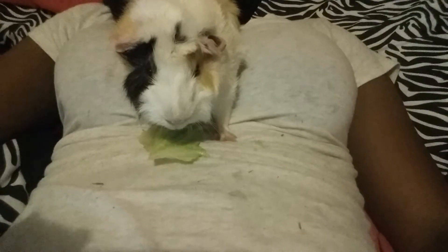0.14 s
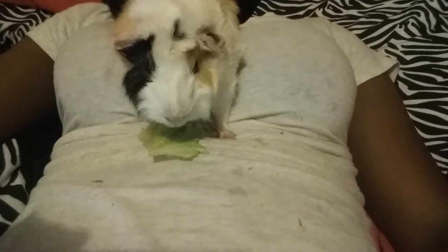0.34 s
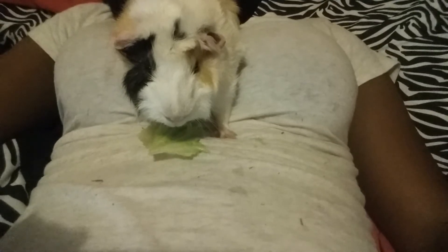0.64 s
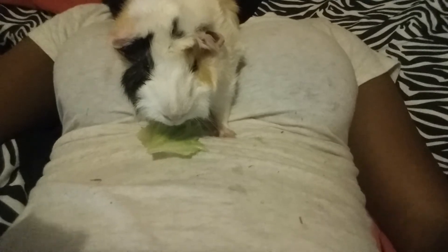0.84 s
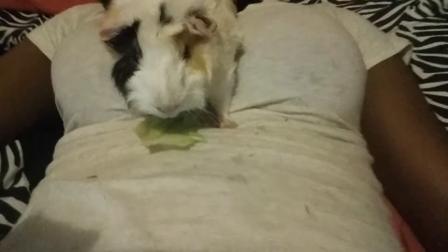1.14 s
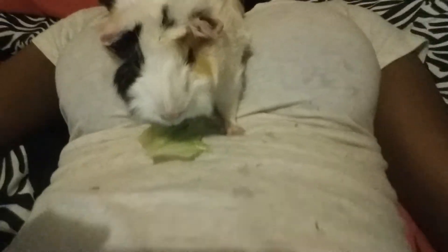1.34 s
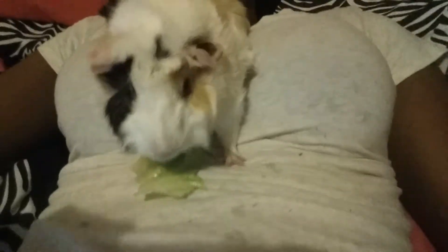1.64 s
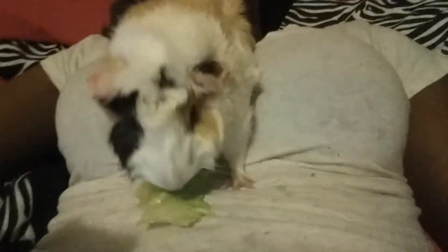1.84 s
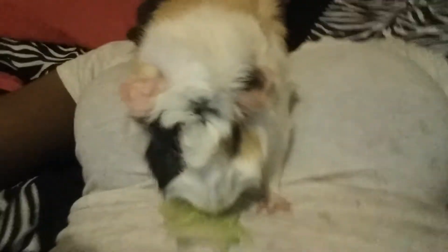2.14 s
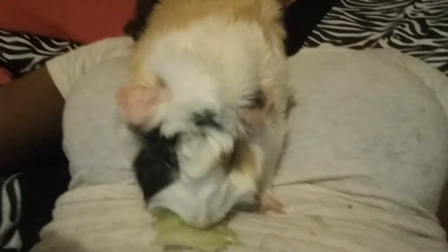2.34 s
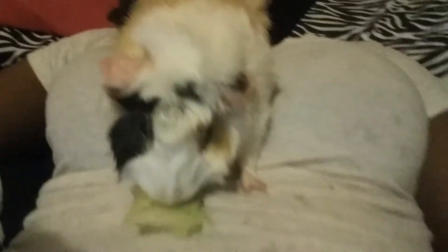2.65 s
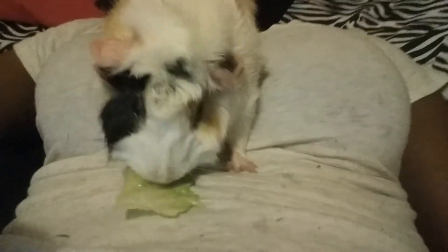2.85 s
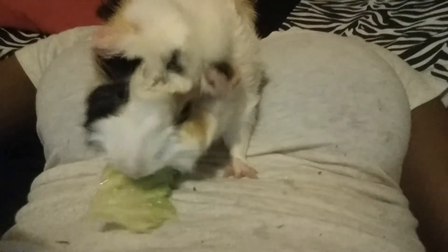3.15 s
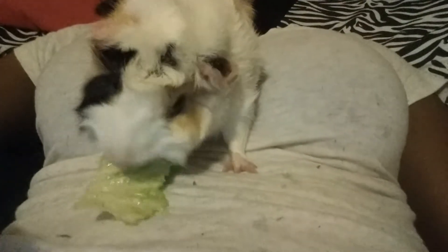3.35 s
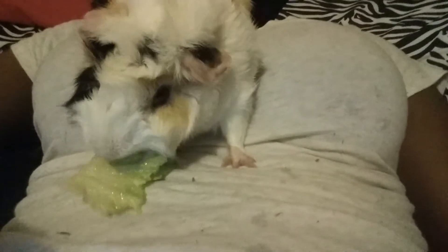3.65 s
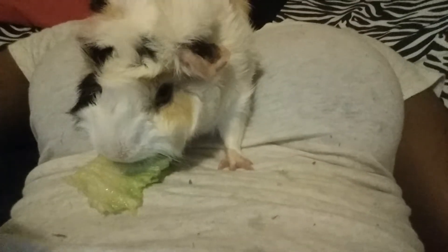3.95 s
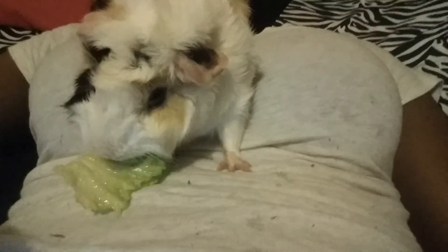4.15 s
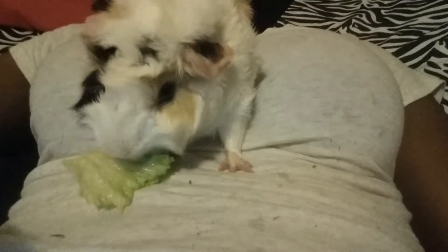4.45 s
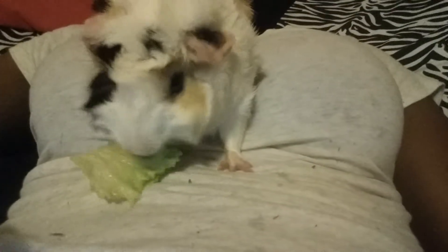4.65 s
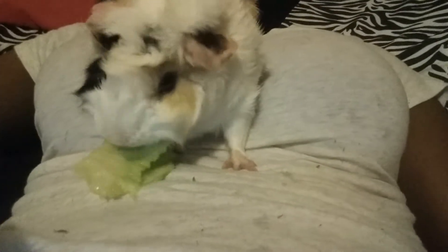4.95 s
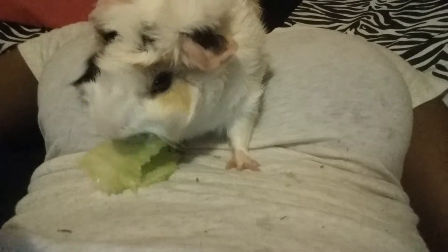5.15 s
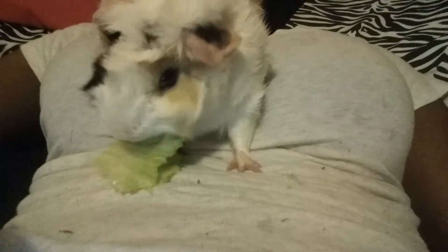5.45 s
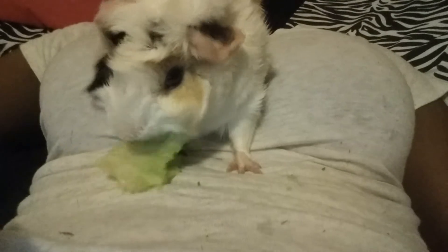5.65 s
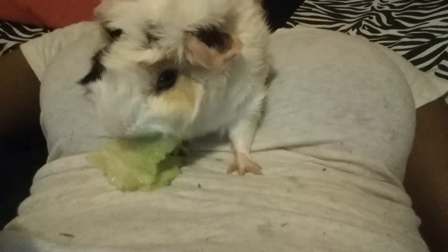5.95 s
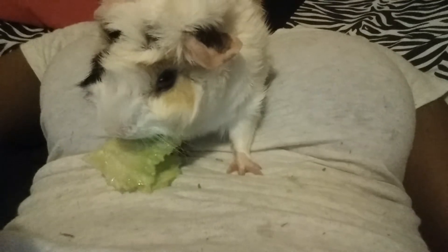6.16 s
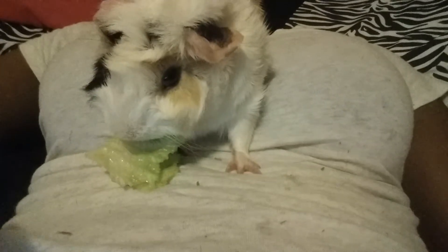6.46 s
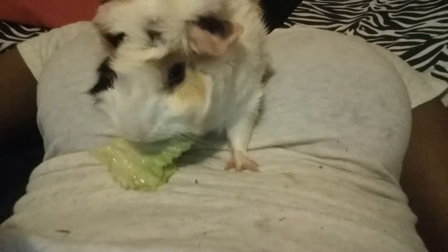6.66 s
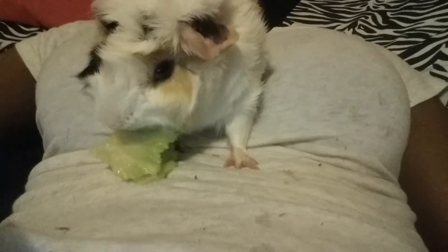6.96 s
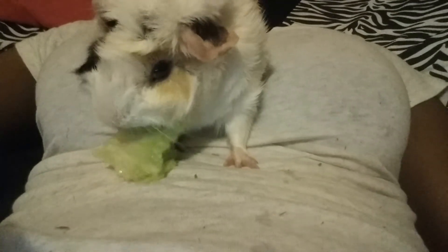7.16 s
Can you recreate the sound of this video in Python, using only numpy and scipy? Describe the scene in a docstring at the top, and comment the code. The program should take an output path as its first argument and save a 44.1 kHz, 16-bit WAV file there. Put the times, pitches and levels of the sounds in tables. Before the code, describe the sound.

Close handheld stereo pickup in a dry indoor room. First only dull low humming and gentle hiss, then under a second of skin rubbing and tapping on the device case, mostly left. After that, quick irregular lettuce chewing by a small animal fills the rest: bright crackling bites, snapping ribs, brief gaps, tiny moist squelches and light rustling, mainly right, with the hum continuing underneath to the end.

```python
"""From the start a household machine hums through room resonances, over soft hiss and a slowly rising whine.
At about 1.5 s a hand slides over the left of a phone's two ports and taps the case: rubbed noise and short rings.
From 2.4 s to the end a guinea pig just in front bites and grinds lettuce: crackling noise shaped by jaw
strokes, bursts for snapping ribs and rising bubbles for wet smacks. The right port faces it, the left is shaded.
Fur and cloth rustle, as noise that comes and goes, from the handling onward."""
import sys
import numpy as np
from scipy import signal
from scipy.fft import rfft, irfft, next_fast_len
from scipy.io import wavfile
from scipy.ndimage import uniform_filter1d, map_coordinates

SR = 44100
rng = np.random.default_rng(int(sys.argv[2]) if len(sys.argv) > 2 else 0)


def output_pcm(signal):
    """Save a mono or channel-first signal as 16-bit PCM at the path in sys.argv[1].

    Samples are clipped to [-1, 1] before scaling.
    """
    pcm = np.clip(np.atleast_2d(signal).T, -1, 1) * 32767
    wavfile.write(sys.argv[1], SR, np.round(pcm).astype(np.int16))


N = 322371

# jaw strokes: t/s, length/s, grinding level about a quarter through/dB, about three quarters through/dB
STROKES = [(2.414, 0.12, -48, -54.5), (2.652, 0.073, -46, -60), (2.781, 0.026, -58, -63),
           (2.859, 0.025, -60.5, -65), (2.996, 0.035, -61, -58), (3.075, 0.089, -47.5, -42.5),
           (3.291, 0.053, -35, -42), (3.489, 0.077, -34, -34), (3.796, 0.069, -36, -39.5),
           (3.875, 0.058, -48, -63), (4.089, 0.052, -51.5, -56), (4.158, 0.055, -36.5, -32),
           (4.405, 0.039, -52.5, -61), (4.454, 0.074, -45, -54), (4.552, 0.022, -72, -55.5),
           (4.61, 0.056, -41.5, -42), (4.774, 0.03, -49.5, -34), (4.873, 0.021, -51, -61),
           (4.965, 0.042, -43.5, -40.5), (5.126, 0.067, -42.5, -59), (5.196, 0.061, -57, -56),
           (5.284, 0.064, -44.5, -47), (5.385, 0.028, -58, -60), (5.442, 0.072, -38, -44.5),
           (5.566, 0.039, -53, -55), (5.627, 0.047, -52.5, -69), (5.705, 0.082, -57, -53),
           (5.846, 0.021, -58, -63), (5.898, 0.059, -39.5, -33), (6.049, 0.056, -35.5, -33.5),
           (6.305, 0.016, -56, -51), (6.351, 0.063, -34.5, -32.5), (6.891, 0.037, -35.5, -43),
           (6.94, 0.046, -68, -67), (7.043, 0.011, -43, -47), (7.057, 0.057, -30.5, -40),
           (7.216, 0.066, -36.5, -30)]
# how the port facing the animal colours the crunch: f/Hz, level/dB
FRONT_COLOUR = [(1000, -14), (2500, -17.5), (3500, -12), (4300, -7.5), (5600, -5), (6800, -7.5),
                (8000, -5.5), (9500, -8), (11000, -7), (12500, -7), (15000, -10.5)]
# how the shaded port colours the crunch: f/Hz, level/dB
SHADE_COLOUR = [(1000, -15.5), (2800, -13), (3500, -6.5), (4300, 5.5), (5300, -6), (6200, 8.5), (7200, -10),
                (8800, -3), (9800, -18), (12000, -9), (15000, -42)]
MOUTH_HZ, MOUTH_WIDTH_HZ = 1850, 420  # usual ring of the mouth cavity
USUAL_DB = -45  # grinding level of a usual stroke
HISS_TOP_HZ, TOP_HZ = 15600, 16800  # upper limits of the hiss and of the whole sound


def amp(db):
    """Turn decibels into a plain factor."""
    return 10 ** (np.asarray(db) / 20)


def unit(x):
    """Scale each row to an average (RMS) strength of 1."""
    return x / np.sqrt(np.mean(x ** 2, axis=-1, keepdims=True) + 1e-20)


def curve(rows):
    """Join (time, value) rows by straight lines, one value per sample."""
    times, values = np.transpose(rows)
    return np.interp(np.arange(N) / SR, times, values)


def colour(points):
    """Tone colour: a gain over frequency from (Hz, dB) points on a log axis."""
    point_hz, point_db = np.transpose(points)
    return lambda f: amp(np.interp(np.log(f + 1), np.log(point_hz), point_db))


def mode(centre_hz, width_hz):
    """A resonance that rings only after it is struck, with gain 1 at its peak."""
    return lambda f: 1j * f * width_hz / (centre_hz ** 2 - f * f + 1j * f * width_hz)


def bump(f, hz, width_hz):
    """A broad rise of the spectrum around hz."""
    return 0.96 + np.exp(-((f - hz) / width_hz) ** 2)


def filtered(x, response):
    """Filter each row by multiplying its spectrum by a response over frequency."""
    size = next_fast_len(x.shape[-1] + 4096)  # spare room for the ringing
    spectrum = rfft(x, size) * response(np.fft.rfftfreq(size, 1 / SR))
    return irfft(spectrum, size)[..., :x.shape[-1]]


def wobble(rate):
    """A smooth random curve through rate random points a second."""
    points = rng.standard_normal(int(N * rate / SR) + 4)
    return map_coordinates(points, [np.arange(N) * rate / SR])


def lay(times, shapes, peak_db):
    """Place each short sound at its time, scaled to its peak level."""
    shapes = shapes / np.abs(shapes).max(axis=1, keepdims=True) * amp(peak_db)[:, None]
    first = np.round(np.asarray(times) * SR).astype(int)[:, None]
    places = first + np.arange(shapes.shape[1])
    return np.bincount(places.ravel(), shapes.ravel(), N + SR)[:N]


def crackle(spread_db, count):
    """Many clicks at chance moments, of widely scattered size, like bursting cells."""
    size = amp(spread_db * rng.exponential(size=count)) * rng.standard_normal(count)
    return unit(np.bincount(rng.integers(0, N, count), size, N))


def pops(times, peak_db, hz, cycles):
    """Soft rings that fade by 60 dB in the given number of cycles."""
    turns = np.outer(hz, np.arange(2600) / SR)
    soft_start = np.minimum(turns / 0.3, 1)
    ring = np.sin(2 * np.pi * turns) * amp(-60 * turns / cycles) * soft_start
    return lay(times, ring, peak_db)


def grinding():
    """Molars crush leaf cells: crackling swells with each jaw stroke and the mouth cavity rings along."""
    t, out = np.arange(N) / SR, np.zeros((2, N))
    flutter = amp(4 * wobble(170))  # pressure flutters as fibres give way
    cells = patchy(crackle(1.44, count=30000), depth_db=3.5) * flutter
    mouth_grows = 0.75  # dB of mouth ring for each dB of grinding
    for start, length, early_db, late_db in STROKES:
        span = slice(int(start * SR) - 300, int((start + length) * SR) + 2600)
        age, crushed = t[span] - start, cells[span]
        left_db, bright_hz, ring_db = head(start)
        level_db = (early_db + late_db) / 2
        mouth_db = ring_db + mouth_grows * (level_db - USUAL_DB)

        phase = 2 * np.clip(age / length, 0, 1) - 1  # -1 to 1 through the stroke
        slope = amp((late_db - early_db) * phase - 2.3 * phase ** 2)  # the bend favours mid-stroke
        attack = np.clip(age / 0.0035 + 1, 0, 1)
        release = amp(-800 * np.clip(age - length, 0, 1))  # falls 800 dB per s
        force = slope * attack * release

        left = amp(left_db) * unit(filtered(scatter(crushed, 0.013), colour(SHADE_COLOUR)))
        right = unit(filtered(scatter(crushed, 0.0018),
                              lambda f: colour(FRONT_COLOUR)(f) * bump(f, bright_hz, 2700)))
        opening = amp(rng.normal(0, 0.26))  # the jaw shifts the cavity pitch
        ring = unit(filtered(crushed,
                             lambda f: mode(opening * MOUTH_HZ, MOUTH_WIDTH_HZ)(f) * f / (f + 900)))
        crunch = amp(level_db) * np.array([left, right])
        mouth = amp(mouth_db) * amp([[-18.5], [-7.5]]) * ring
        out[:, span] += force * (crunch + mouth)
    return out


def patchy(x, depth_db):
    """Random gain in small patches of time and pitch: every torn piece of leaf has its own timbre."""
    z = signal.stft(x, nperseg=128)[2]
    field = uniform_filter1d(rng.standard_normal(z.shape), size=7, axis=0)  # smooth over pitch
    field = uniform_filter1d(field, size=5, axis=1)  # smooth over time
    return signal.istft(z * amp(depth_db * field / field.std()), nperseg=128)[1][:N]


def scatter(x, t60):
    """Reflections off leaf, fur and cloth smear the sound; they fade by 60 dB in t60 seconds."""
    t = np.arange(400) / SR
    echoes = amp(-60 * t / t60) * rng.standard_normal(len(t))
    return signal.fftconvolve(x, echoes)[:len(x)]


def head(s):
    """The head turns and lifts, changing left level, brightness and mouth ring at the moments s."""
    # head positions: t/s, left port level relative to right/dB, brightness f/Hz,
    # mouth ring level in a usual stroke, ahead of the port offsets/dB
    poses = [(2.4, -3.5, 7550, -53), (2.66, -6.5, 7740, -58), (2.82, -15, 7060, -36), (3.1, -3, 7860, -44),
             (3.4, -9.5, 9400, -51), (3.83, -11.5, 8600, -56), (4.18, -11.5, 9600, -48.5),
             (4.48, -16, 9000, -51.5), (4.8, -22, 8960, -52), (5.13, -7, 9700, -51),
             (5.45, -18, 10900, -46.5), (5.7, -7, 9000, -42), (5.92, -17.5, 10800, -50),
             (6.08, -17.5, 11100, -47.5), (6.38, -15, 9800, -44), (6.7, -2, 9200, -37.5),
             (6.9, -13, 8600, -52), (7.07, -17.5, 11200, -48.5), (7.31, -13.5, 10600, -50.5)]
    times, *columns = np.transpose(poses)
    return [np.interp(s, times, column) for column in columns]


def snaps():
    """Ribs and veins break in short noise bursts with scattered echoes, and the mouth cavity rings."""
    # thick leaf ribs that snap: t/s, peak level at the right port/dB
    ribs = [(2.4642, -15.5), (2.4758, -14.5), (2.479, -22), (2.6582, -30), (3.0096, -24), (3.022, -32),
            (3.1125, -24), (3.1243, -24), (3.1315, -7), (3.1433, -14), (3.1507, -16), (3.3089, -19),
            (3.3226, -18), (3.4895, -23), (3.498, -19), (3.505, -17), (3.5298, -4), (3.5341, -6),
            (3.5504, -14.5), (3.8188, -9), (3.8233, -12.5), (3.837, -11), (3.8457, -1), (3.8831, -17),
            (3.9442, -35), (4.161, -17.5), (4.1715, -26), (4.1866, -25), (4.1892, -10), (4.1948, -5),
            (4.2012, -18), (4.2388, -20), (4.3899, -41), (4.4714, -21), (4.4924, -22), (4.5083, -20),
            (4.624, -19.5), (4.637, -15.5), (4.6609, -14), (4.686, -30), (4.7007, -21), (4.7379, -26),
            (4.7451, -27.5), (4.7765, -26), (4.7976, -7), (4.8074, -8), (4.8265, -15.5), (4.8762, -19.5),
            (4.9498, -29.5), (4.9731, -16.5), (4.9921, -15.5), (5.085, -36), (5.1274, -27), (5.294, -19),
            (5.321, -32), (5.356, -40), (5.443, -22), (5.465, -16), (5.4728, -15.5), (5.6302, -39),
            (5.726, -34), (5.7537, -21.5), (5.773, -34), (5.784, -28), (5.91, -14), (5.9235, -13.5),
            (5.9454, -22), (5.958, -11.5), (6.045, -30), (6.0576, -9.5), (6.071, -19), (6.0758, -8),
            (6.0831, -10), (6.086, -14), (6.109, -22), (6.1177, -26), (6.3561, -27), (6.3749, -3.5),
            (6.3823, -12), (6.3882, -11), (6.3936, -12), (6.4016, -4), (6.4045, -17), (6.4097, -12),
            (6.4159, -16), (6.6797, -34), (6.7266, -24), (6.7313, -29.5), (6.8924, -27), (6.908, -9.5),
            (6.9477, -29), (6.9721, -33), (6.987, -35), (7.045, -27), (7.057, -20), (7.0643, -9.5),
            (7.0775, -6.5), (7.0885, -15), (7.114, -34), (7.232, -7.5), (7.2376, -18), (7.2542, -1.5),
            (7.2573, -22), (7.276, -14), (7.281, -13)]
    s, peak_db = np.vstack([ribs, veins()]).T
    chance = rng.standard_normal((len(s), 4))
    left_db, bright_hz, ring_db = head(s)
    snap_hz = bright_hz * (1 + 0.026 * chance[:, 3])  # each break has its own pitch

    t = np.arange(300) / SR - .0003
    rise = amp(60 * t / .0004)
    decay = amp(-60 * t / .0013) + .1 * amp(-60 * t / .007)  # the break, then its echoes
    burst = rng.standard_normal((len(s), 2, len(t))) * np.where(t < 0, rise, decay)
    treble = lambda f: f ** 2 / (f ** 2 + 4000 ** 2)
    right = filtered(burst[:, 1], lambda f: colour(FRONT_COLOUR)(f)
                     * bump(f, snap_hz[:, None], 2650) ** 2 * treble(f))
    left = filtered(burst[:, 0], colour(SHADE_COLOUR))
    left_peak_db = peak_db + left_db + 1.8 * chance[:, 2] - 2.5

    ring_hz = MOUTH_HZ * amp(0.52 * chance[:, 0])
    ring = np.sin(2 * np.pi * np.outer(ring_hz, t)) * amp(-60 * t / 0.0071) * np.clip(t / 0.00039, 0, 1)
    cavity = lay(s, ring, 0.76 * peak_db + ring_db + 3.34 * chance[:, 1] + 23)
    return np.array([lay(s, left, left_peak_db), lay(s, right, peak_db)]) + amp([[-11], [0]]) * cavity


def veins():
    """Thin veins break at chance moments in each stroke, louder when the stroke is strong."""
    count, reach = 3, 1.2  # breaks per stroke, share of the stroke they may fall in
    usual_peak_db, grows, spread_db = -34.5, 0.73, 4  # grows: dB for each dB of grinding
    start, length, early_db, late_db = np.transpose(STROKES)[..., None]
    when = rng.random((len(STROKES), count))
    size = rng.standard_normal((len(STROKES), count))
    strength_db = (early_db + late_db) / 2 - USUAL_DB
    peak_db = usual_peak_db + grows * strength_db + spread_db * size
    return np.transpose([(start + reach * length * when).ravel(), peak_db.ravel()])


def smacks():
    """Tongue and juice squelch: a bubble whose pitch rises, wrapped in wet noise that the mouth colours."""
    # wet mouth smacks: t/s, peak level ahead of the port offsets/dB, basic pitch f/Hz
    squelches = [(2.47, -35, 525), (2.791, -41, 917), (3.15, -46, 1180), (3.246, -43.5, 887),
                 (3.554, -40.5, 715), (3.594, -47, 634), (4.45, -42.5, 975), (4.723, -52, 870),
                 (4.743, -41, 694), (4.798, -48, 865), (4.814, -42, 797), (4.865, -43, 797),
                 (5.495, -42, 772), (6.32, -54, 1400), (6.365, -43, 600), (6.754, -49.5, 1040),
                 (7.073, -43, 980)]
    s, peak_db, hz = np.transpose(squelches)
    t = np.arange(1200) / SR
    swell = t * np.exp(-t / 0.0036)
    bubble = np.sin(2 * np.pi * np.outer(hz, 0.94 * t + 5 * t * t))  # the squared term lifts the pitch
    wet_colour = lambda f: mode(MOUTH_HZ, 1100)(f) ** 2 + 4.6 * mode(hz[:, None], 400)(f) ** 2
    wet = unit(filtered(rng.standard_normal(bubble.shape), wet_colour))
    squelch = swell * (bubble + .75 * wet)
    return amp([[-2], [3.5]]) * lay(s - .003, squelch, peak_db)


def nearby(x):
    """Cushions, arms and the wall return a short diffuse tail."""
    t = np.arange(SR // 10) / SR
    tail = rng.standard_normal((2, len(t))) * amp(-60 * t / 0.043) * (t > .001)
    tail = tail / np.linalg.norm(tail[0])
    return amp(-14) * signal.fftconvolve(x, tail, axes=1)[:, :N]


def hand():
    """The grip shifts: skin slides, the case knocks and ticks, and the hand jolts."""
    # jolts of the hand, alike at both ports: t/s, peak level/dB, pitch f/Hz
    thumps = [(2.175, -29.5, 106), (2.304, -34, 91), (2.472, -28, 113)]
    return skin_slide() + case_knocks() + case_ticks() + pops(*np.transpose(thumps), cycles=5.3)


def skin_slide():
    """Skin over the left port makes dense crackling; the right port gets it slightly earlier and duller."""
    # colour of the sliding skin at the left port: f/Hz, level/dB
    left_colour = [(300, -2), (800, 3.5), (1900, -2), (3000, 1), (4600, 0), (6300, 3.5), (7200, 3),
                   (8500, -11), (12000, -13), (15000, -16)]
    # colour of the sliding skin at the right port: f/Hz, level/dB
    right_colour = [(300, -26), (800, 1), (1500, -5), (2500, -15), (3500, -20), (5000, -40)]
    skin = crackle(0.44, count=150000) * rubbing() * amp(1.0 * wobble(60.1))
    left = filtered(skin, colour(left_colour))
    right = filtered(np.roll(skin, -9), colour(right_colour))  # 9 samples earlier
    return np.array([left, right]) * amp(9.5)


def rubbing():
    """Pressure of the skin: each rub sets in, sags or swells while it lasts and lets go."""
    # skin rubs: t/s, length/s, starting level ahead of colour and gain/dB, sag (below 0: swell)/dB per s
    rubs = [(1.533, .13, -38.5, 84), (1.769, 0.017, -39, 100), (1.807, 0.077, -57, -120),
            (1.91, .025, -52, 100), (1.967, 0.091, -50, 58), (2.128, 0.041, -60.5, -100)]
    attack_s, release_db_per_s = 0.017, 900
    pressure = np.zeros(N)
    for start, length, start_db, sag in rubs:
        age = np.arange(N) / SR - start
        level_db = start_db - sag * np.clip(age, 0, length)
        level_db = level_db - release_db_per_s * np.clip(age - length, 0, 1)
        pressure += np.clip(age / attack_s, 0, 1) * amp(level_db)
    return pressure


def case_knocks():
    """A finger knock rings several modes of the case, stronger at one port."""
    # finger knocks: t/s, peak level ahead of mode and side gains/dB, pitch f/Hz, left minus right/dB
    taps = [(1.529, -29.5, 700, 17), (1.547, -22, 754, 14), (1.776, -29.5, 680, 8), (1.85, -37.5, 555, -26),
            (1.878, -30, 700, 10), (2.098, -31.5, 610, 17), (2.145, -37.5, 553, -24),
            (2.176, -38, 501, -22), (2.223, -19.5, 690, -26), (2.296, -35.5, 746, -27)]
    # modes of the case: multiple of the knock pitch, level/dB
    case_modes = [(1, 3), (1.87, -1), (2.9, -5.5), (4.5, -43)]
    s, peak_db, hz, pan_db = np.transpose(taps)
    share_db = lambda side: -20 * np.log10((1 + amp(-side * pan_db)) / 2)
    return np.array([sum(pops(s, peak_db + db + share_db(side), multiple * hz, cycles=6.0)
                         for multiple, db in case_modes)
                     for side in (1, -1)])  # left, then right


def case_ticks():
    """Sharp ticks of the case are tiny noise bursts coloured by the cavity behind each port."""
    # ticks: t/s, left peak level/dB, right peak level/dB, time for the main burst to fade by 60 dB/s
    clicks = [(1.529, -26, -46, 0.00081), (1.5401, -23, -48, 0.0018), (1.878, -32, -47, .001),
              (1.882, -37, -45, .001), (1.891, -33, -47, 0.00087), (2.0983, -4.5, -30, 0.00043),
              (2.143, -48, -30, 0.0016), (2.1742, -27, -54, 0.0053), (2.223, -32, -20.5, 0.0028),
              (2.226, -53, -32, .001), (2.297, -7, -12, 0.0047)]
    # cavity behind the left, then the right port: f/Hz, width/Hz
    port_cavities = [(6300, 3360), (8500, 4400)]
    s, left_db, right_db, t60 = np.transpose(clicks)
    t = np.arange(200) / SR
    fade = amp(-60 * t / t60[:, None]) + 0.074 * amp(-60 * t / 0.0064)
    sharp = rng.standard_normal((2, len(s), len(t))) * fade

    def cavity(hz, width):
        """A port cavity passes sound evenly below its peak, apart from weak bass."""
        return lambda f: (hz ** 2 / (hz ** 2 - f * f + 1j * f * width)) ** 2 * 1j * f / (900 + 1j * f)

    return np.array([lay(s, filtered(x, cavity(*port)), db)
                     for x, port, db in zip(sharp, port_cavities, (left_db, right_db))])


def rustle():
    """Fur and cloth rub as the animal moves, and the leaf keeps crackling faintly between bites."""
    # rustling of fur and cloth: t/s, level ahead of the port offsets and wobble/dB
    rustle_levels = [(0, -93), (1.455, -72), (1.47, -55), (1.52, -60), (1.65, -58), (1.82, -51), (2.0, -57),
                     (2.08, -65), (2.22, -54.5), (2.35, -58.5), (3.0, -64), (3.7, -64.5), (4.3, -73),
                     (4.9, -62), (5.5, -62.5), (6.0, -64.5), (6.5, -72), (6.95, -58), (7.31, -67)]
    leaf = 0.18 * crackle(4.4, count=1500) * (np.arange(N) > 2.4 * SR)
    source = rng.standard_normal((2, N)) + leaf

    def both_ports(f):
        """Port colours plus a rise at the mouth pitch."""
        front = colour(FRONT_COLOUR)(f) * bump(f, 8650, 1500)
        return np.array([colour(SHADE_COLOUR)(f), front]) + 0.93 * mode(MOUTH_HZ, 1200)(f)

    level = amp(curve(rustle_levels) + 3.5 * wobble(25))
    return unit(filtered(source, both_ports)) * amp([[-9], [0]]) * level


def hum():
    """Machine noise sustained in the room's low resonances, nearly alike at both ports."""
    # room resonances that the machine excites: f/Hz, width before sharpening/Hz, relative level/dB
    room_modes = [(67.6, 19.4, -8), (108.7, 7, -7.5), (146.2, 8.1, 0.5), (168.9, 7.1, 1.5), (210, 7.8, -6),
                  (245.9, 16.3, -6.5), (309.7, 51, -16), (343.3, 20.6, -14), (393, 36.5, -15),
                  (449.4, 33.4, -20.5), (566, 24, -29.5)]
    # part of the hum that differs between the ports: f/Hz, level relative to the shared part/dB
    apart_colour = [(40, -8), (70, -14), (160, -18), (300, -16.5), (600, -7)]
    # how the hum wavers: t/s, level ahead of the port offsets/dB
    hum_levels = [(0.0, -46), (2.71, -41.5), (2.89, -45), (7.21, -43), (7.31, -43.5)]

    def room(f):
        """The resonances add by power, each sharpened by an exponent."""
        return np.sqrt(sum(np.abs(amp(db) * mode(hz, width)(f) ** 1.437) ** 2
                           for hz, width, db in room_modes))

    noise = rng.standard_normal((2, N))
    common, apart = unit(filtered(noise, lambda f: room(f) * f ** 2 / (f ** 2 + 45 ** 2)))
    apart = filtered(apart, colour(apart_colour))
    return amp([[-1.5], [2.5]]) * amp(curve(hum_levels)) * np.array([common + apart, common - apart])


def whine():
    """A thin sine tone creeps upward with small wobbles, much stronger at the left port."""
    # whine: t/s, pitch ahead of the wobble f/Hz
    whine_pitch = [(0, 6785), (1.5, 6925), (4.3, 7070), (6.4, 7125), (7.31, 7330)]
    hz = curve(whine_pitch) + 3 * wobble(30)
    tone = np.sin(2 * np.pi * np.cumsum(hz) / SR) * amp(1.2 * wobble(9.1))
    return amp([[-73], [-92]]) * tone


def hiss():
    """Distant air noise and microphone noise: steady random noise with a colour for each port."""
    # steady hiss at the left port: f/Hz, relative level/dB
    left_hiss = [(300, -45), (550, -19), (850, 2), (1200, -4.5), (1900, -9.5), (3000, -11), (5000, -14),
                 (6900, -12), (8000, -16), (11000, -15), (15000, -12.5)]
    # steady hiss at the right port: f/Hz, relative level/dB
    right_hiss = [(300, -15), (550, -1.5), (850, 2.5), (1400, -1), (1900, -7), (3000, -10), (6500, -15.5),
                  (7400, -24), (8000, -8.5), (8700, -16), (9500, -16), (13500, -13), (15000, -14)]
    both_ports = lambda f: np.array([colour(left_hiss)(f), colour(right_hiss)(f)]) * (f < HISS_TOP_HZ)
    return amp(-52) * filtered(rng.standard_normal((2, N)), both_ports)


def scene():
    """Add the near sounds, soften their highest treble, then add the background."""
    chew = grinding() + snaps() + smacks()
    near = chew + nearby(chew) + hand() + rustle()
    soft_top = lambda f: 1 / (1 + (f / HISS_TOP_HZ) ** 70) + 0.011
    return filtered(near, soft_top) + hum() + whine() + hiss()


def record(dry):
    """The deepest bass is cut, and the sound holds nothing above TOP_HZ."""
    return filtered(dry, lambda f: (1j * f / (40 + 1j * f)) ** 2 * (f < TOP_HZ))


dry = scene()
out = record(dry)
output_pcm(out)
```